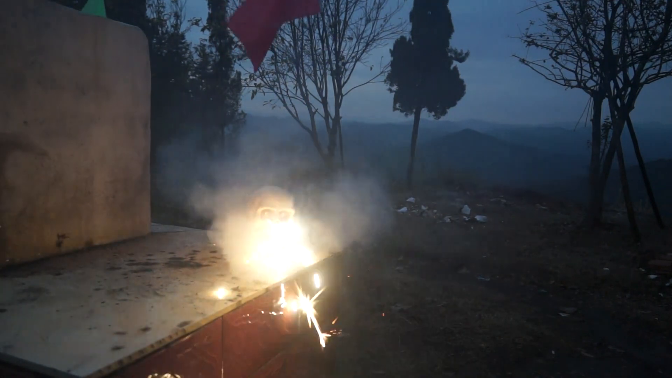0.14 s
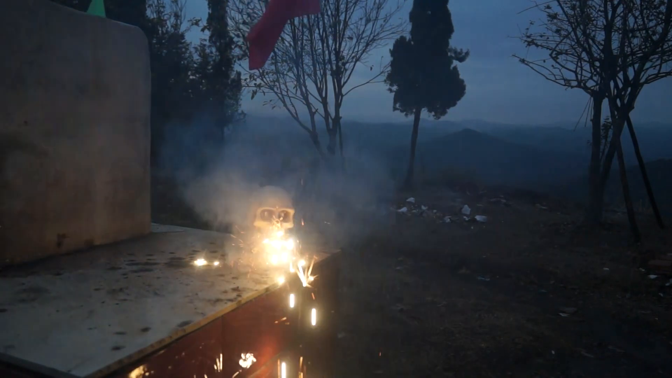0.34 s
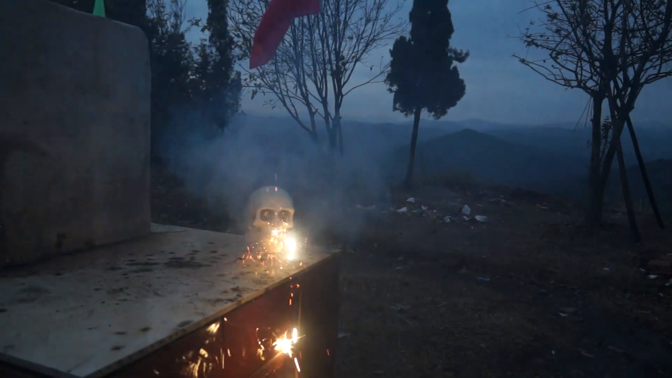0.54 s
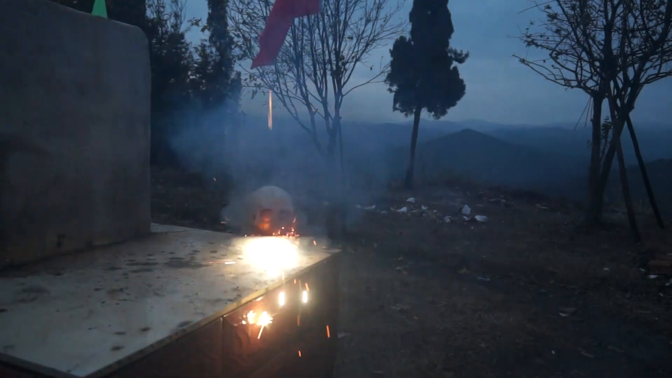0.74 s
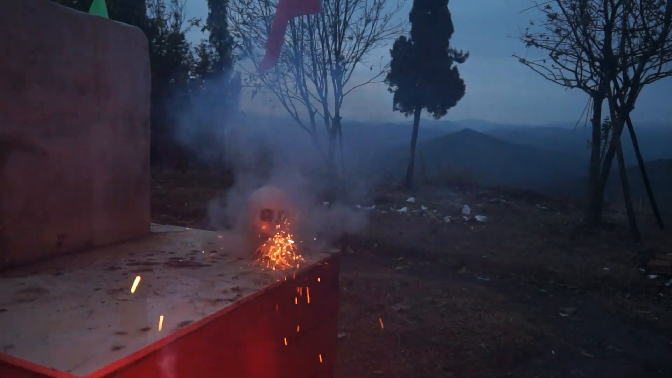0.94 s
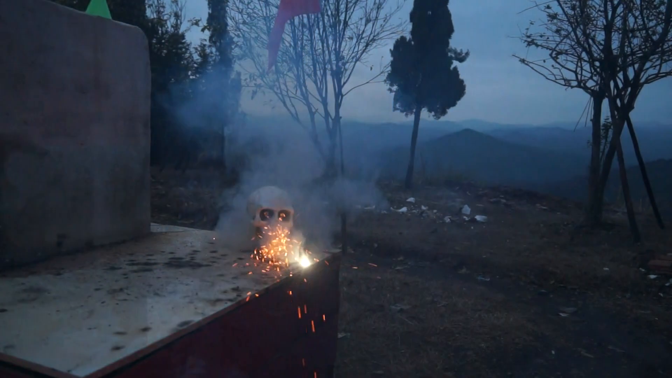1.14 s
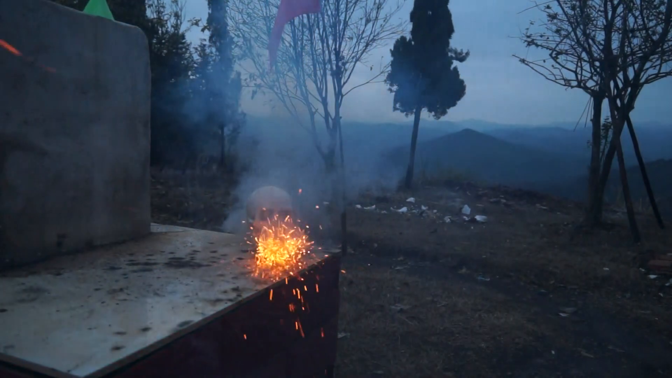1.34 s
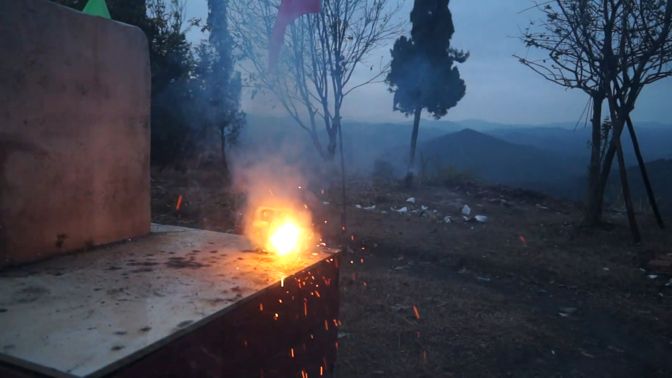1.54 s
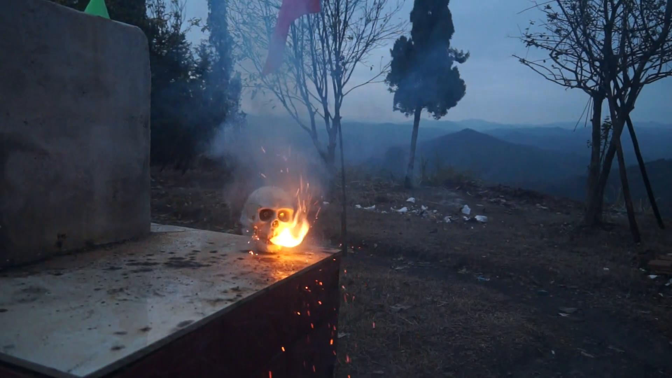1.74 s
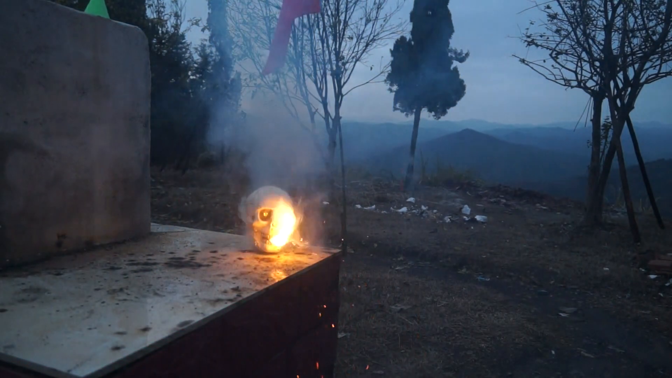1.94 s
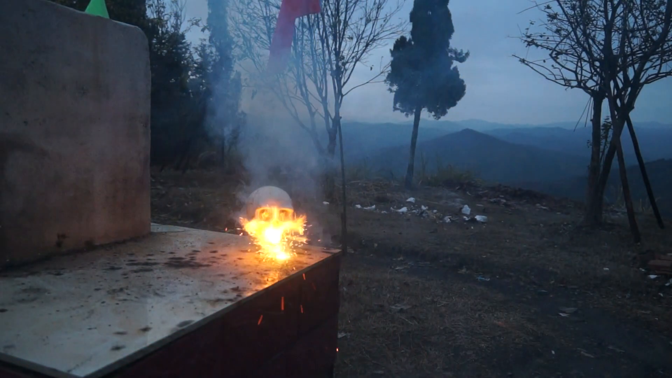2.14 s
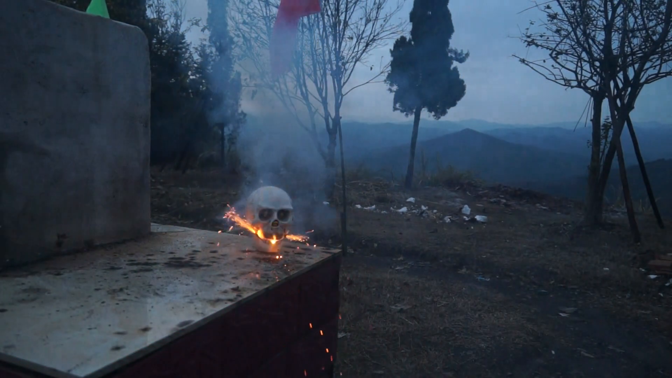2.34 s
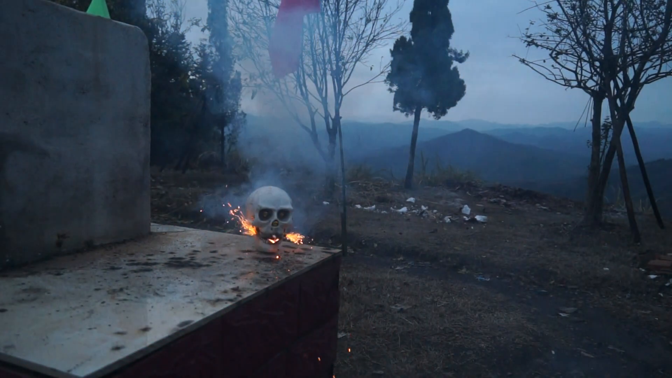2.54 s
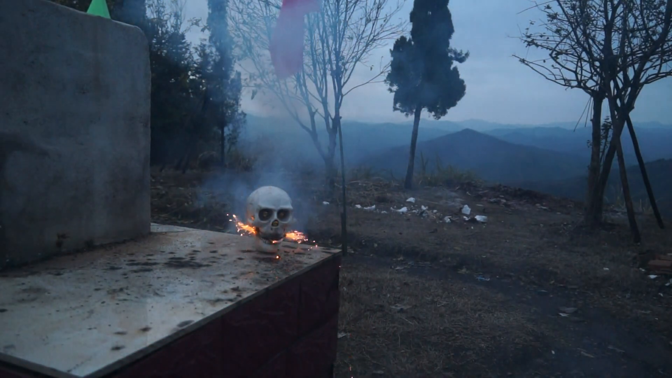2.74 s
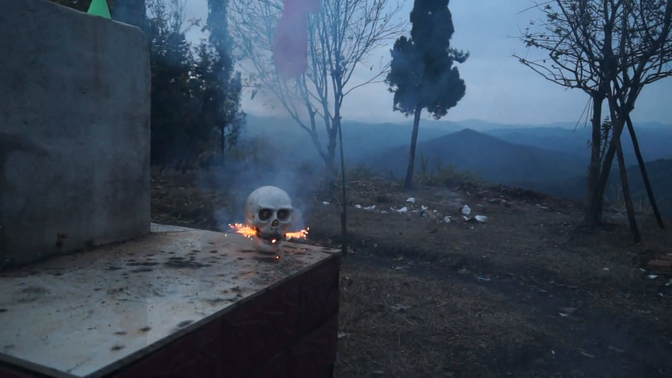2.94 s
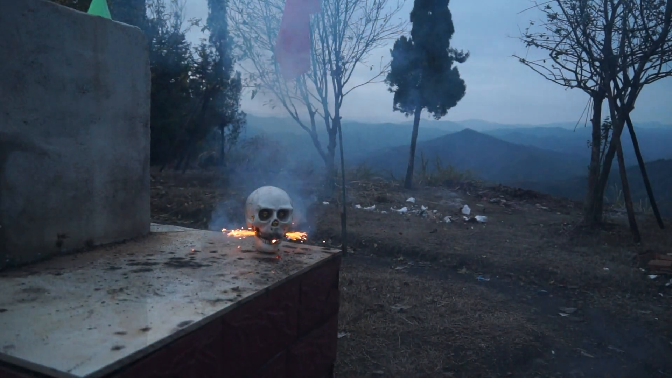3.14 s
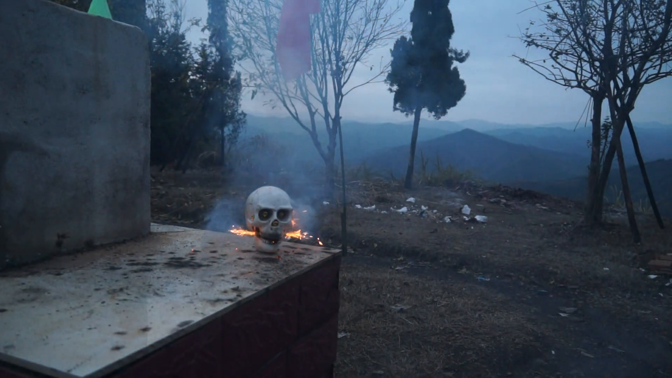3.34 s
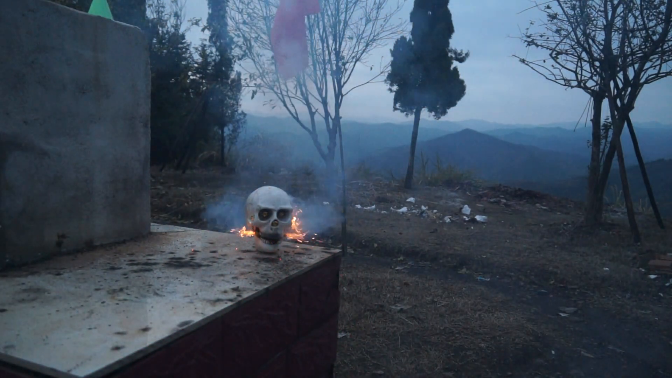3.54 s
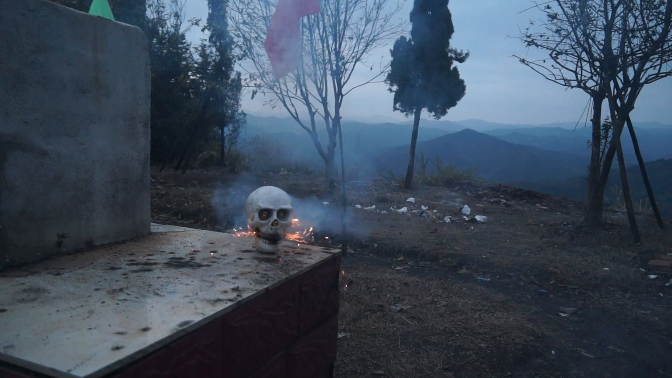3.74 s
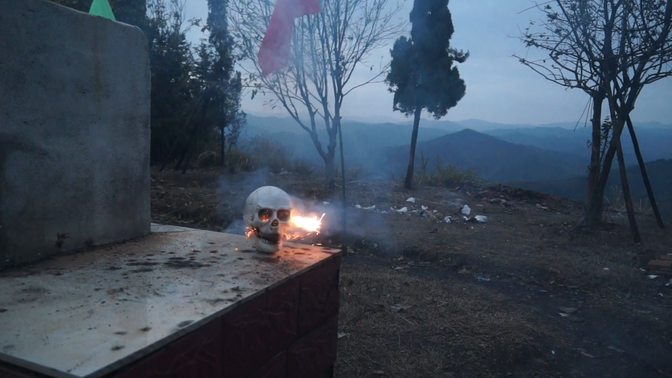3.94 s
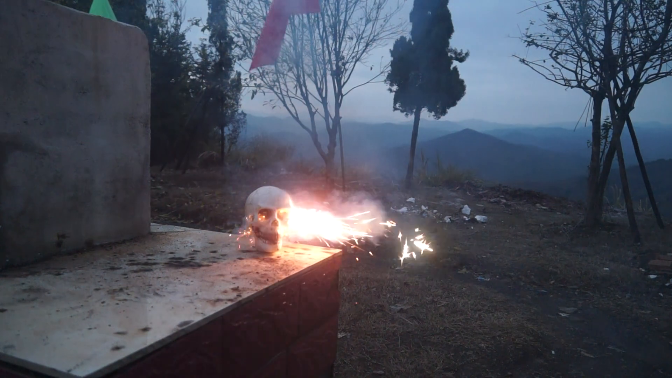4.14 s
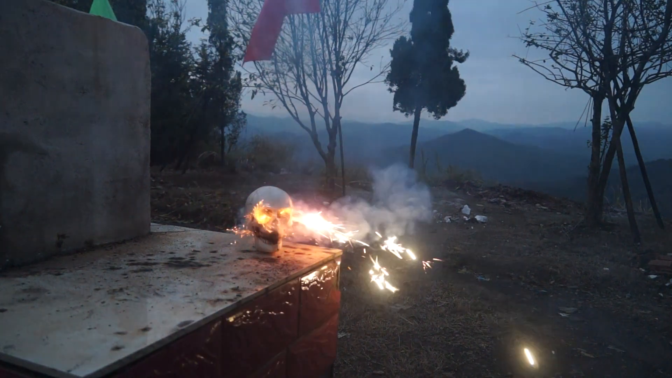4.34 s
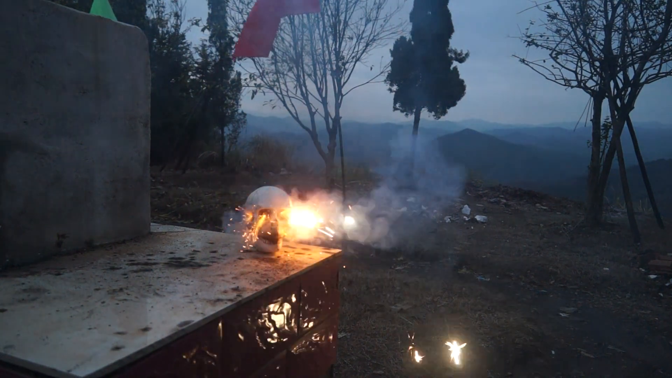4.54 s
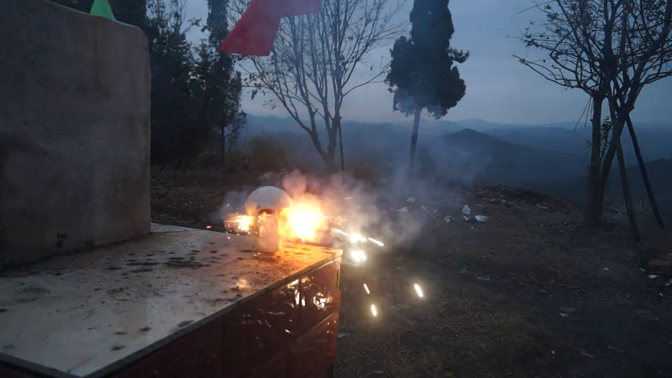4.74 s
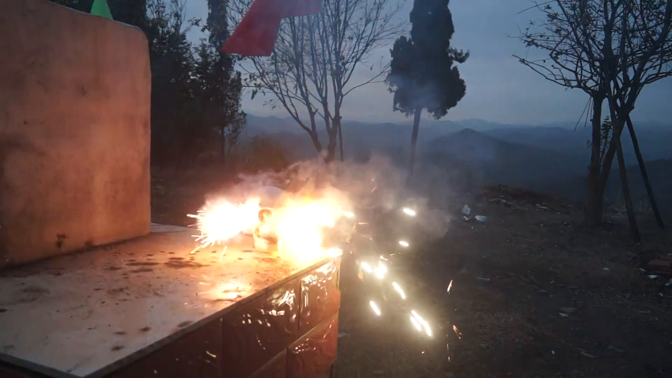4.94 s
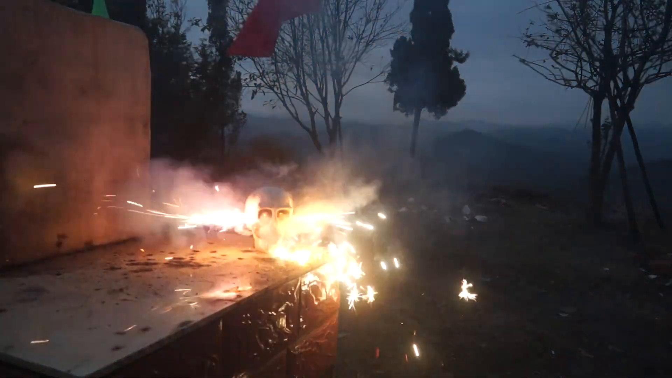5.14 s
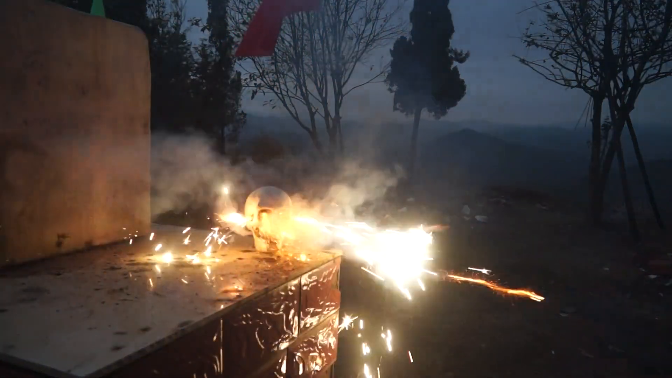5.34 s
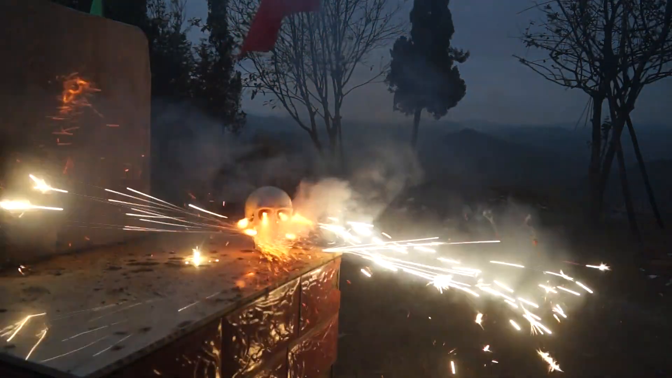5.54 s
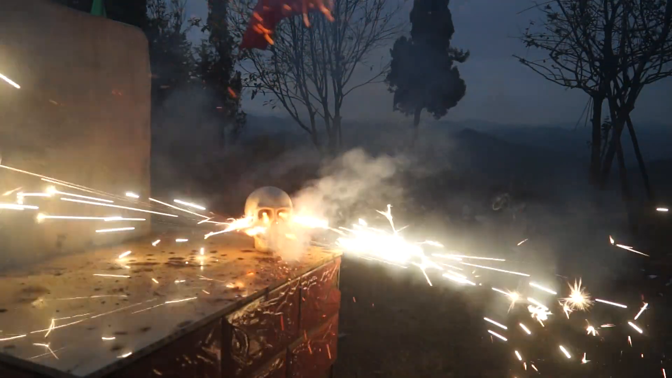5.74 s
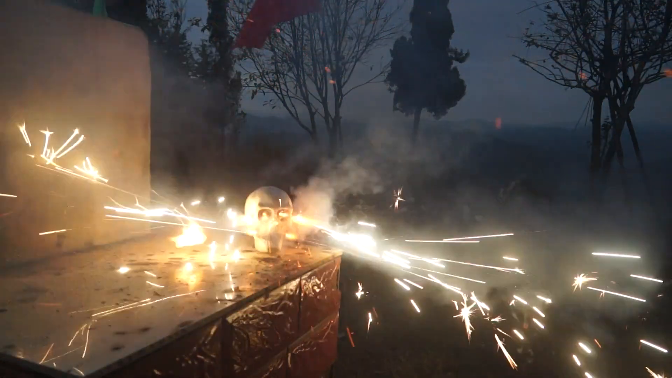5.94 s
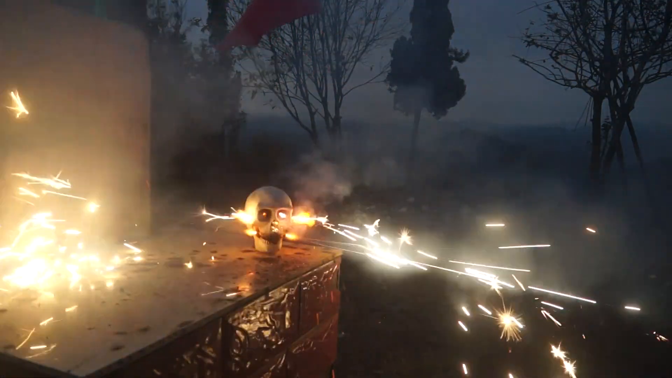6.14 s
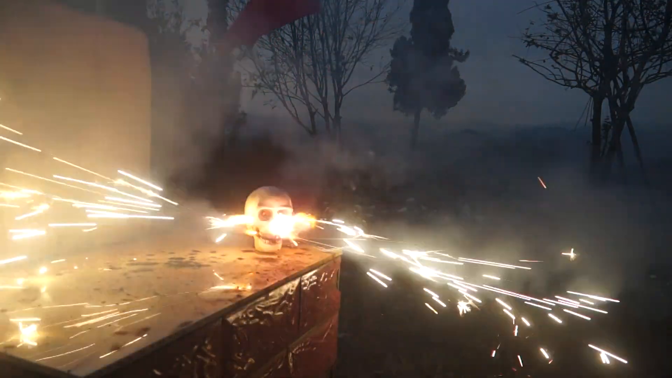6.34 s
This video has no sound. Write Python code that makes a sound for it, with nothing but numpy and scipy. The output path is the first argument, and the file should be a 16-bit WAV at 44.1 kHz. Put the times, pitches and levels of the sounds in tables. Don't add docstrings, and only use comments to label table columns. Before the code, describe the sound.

Outdoors, close to a phone microphone, a small fountain firework fizzes and sputters with crackling sparks, then sharp, distorted cracks that slap off stone. It dies to a faint smoulder, two late pops, then hisses back in swelling flares. Suddenly two piercing whistles light one after the other, loud and harsh, sliding down in pitch over rushing gas until the cut.

```python
import sys
import numpy as np
from scipy import signal
from scipy.fft import rfft, irfft, next_fast_len
from scipy.io import wavfile
from scipy.ndimage import uniform_filter1d, map_coordinates

SR = 44100
rng = np.random.default_rng(int(sys.argv[2]) if len(sys.argv) > 2 else 0)


def master(y):
    cut = np.clip(np.atleast_2d(y).T, -1, 1)
    pcm = np.round(cut * 32767)
    wavfile.write(sys.argv[1], SR, pcm.astype(np.int16))


def volts_from_decibels(level):
    exponent = np.asarray(level, float) / 20
    return 10 ** exponent


N = 286650

SLAB_S = 0.001486
SIDES_S, JETS_S = 2.1, 5.345

# frequency in Hz, density in dB per Hz.
VALLEY_COLOUR = [(20, -14), (60, -3), (200, -4.5), (400, -30)]
# frequency in Hz, density in dB per Hz.
MOUTH_ROAR = [(30, -15), (250, 3.5), (700, 1.5), (1400, -8.5), (2000, -41.5)]
MOUTH_HISS = [(590, -35.5), (1000, -7), (1120, -17), (1350, -6.5), (1730, -9), (2050, -0.5), (2710, -8),
              (2970, -5.5), (4700, -11), (6110, -31.5), (10300, -120)]
# frequency in Hz, density in dB per Hz.
SIDE_ROAR = [(18, -62.5), (30, -36.5), (130, -9), (272, 0.5), (387, -2.5), (492, -12), (588, -3),
             (736, -0.5), (810, -2.5), (892, -3), (1400, -5.5), (1820, -48), (3080, -120)]
SIDE_HISS = [(310, -34.5), (520, -13.5), (643, -4.5), (1130, -9), (1290, -3), (1660, -0.5), (2030, -4),
             (2360, 1.5), (2880, -5.5), (3190, 0), (3530, -5.5), (3800, 0.5), (4250, -3), (4700, -1),
             (6110, -12), (10300, -120)]
# frequency in Hz, density in dB per Hz.
SIZZLE = [(2530, -38.5), (4300, -6.5), (6500, 2), (8200, -3.5), (10700, -22.5), (18000, -120)]
AIR = [(4590, -38.5), (7800, -6.5), (9340, 1), (12300, -3.5), (14100, -7.5), (16000, -21.5)]
# frequency in Hz, correlation (0-1).
FIRE_ALIKE = [(60, 0.75), (130, 0.93), (290, 0.87), (640, 0.96), (1410, 0.98), (3100, 0.84), (6820, 0.97),
              (15000, 0.71)]
JET_ALIKE = [(60, 0.08), (130, 0.17), (290, 0.2), (640, 0.286), (1410, 0.22), (3100, 1), (6820, 1),
             (15000, 0.51)]

# time in seconds, strength in dB, brightness in dB.
MOUTH_FIRE = [
    (0, -37, 2),
    (.3, -31.5, 7.5),
    (.55, -40, 2.5),
    (.6, -49, 3.5),
    (.72, -44, 6),
    (1.45, -60.5, -3),
    (1.65, -54, 4),
    (1.95, -53.5, 4),
    (2.3, -57.5, -4.5),
]
SIDE_FIRE = [
    (2.1, -52.5, -1.5),
    (2.8, -51, 2),
    (3.5, -45.5, -2),
    (3.95, -43.5, 7),
    (4.12, -36.5, 5.5),
    (4.35, -38.5, 1),
    (4.75, -33.5, -2.5),
    (5.18, -31.5, 8.5),
    (5.34, -29, -2),
]
TUBE_JETS = [
    (5.345, -22.5, 3),
    (5.37, -20, 4),
    (5.46, -21.5, 5),
    (5.49, -13, 4.7),
    (5.78, -19, 2),
    (5.86, -16, 6),
    (6, -17, 1),
    (6.25, -15.5, 4),
    (6.5, -15.5, 3),
]
# level in dB at mean strength, growth in dB per dB, share of brightness.
MOUTH_MIX = [
    (-9, 1.48, -1.4),
    (1.9, 0.84, -0.36),
    (-1.5, 0.555, -0.19),
    (-0.7, 0.51, .99),
]
SIDE_MIX = [
    (-13, 1.19, -0.28),
    (0.06, 1.067, -0.093),
    (-1.5, 1.41, 0.44),
    (-0.76, 1.11, .99),
]
JET_MIX = [
    (-3, 2.1, -1.1),
    (0.5, 0.88, -0.028),
    (-2, 1.6, -.3),
    (1.5, 2.5, 0.6),
]
EMBER_MIX = [
    -15.5,
    1,
    0.5,
    -4,
]
PUFF_MIX = [
    -1,
    -3.5,
    -1.5,
    -2,
]

# start in seconds, peak in dB, brightness in dB.
SPARKS = [(0.0633, -13, 11), (0.0744, -19, -1), (0.0818, -18, 0), (0.1001, -17, -1), (0.133, -17, 14),
          (0.17, -15, 12), (0.1975, -19, 12), (0.2092, -17, 15), (0.2242, -16, 9), (0.248, -15, 13),
          (0.2937, -17, 18), (0.3007, -16, 8), (0.3167, -9, -2), (0.3244, -17, 10), (0.3441, -15, 15),
          (0.3576, -18, 8), (0.3798, -14, 10), (0.4128, -12, 16), (0.4182, -14, 13), (0.4221, -1, 0),
          (0.4252, -11, 6), (0.4739, -14, 14), (0.4904, -17, 16), (0.5645, -16, 13), (4.2383, -5, 3),
          (4.303, -6, 5), (4.3768, -20, 16), (4.4598, -19, 16)]
# start in seconds, peak in dB, brightness in dB.
STARS = [(0.4356, -1, -7), (0.531, -5, -4), (0.5679, 1, 4), (0.7062, 1, -7), (0.7193, 2, 3),
         (0.7431, -2, 0), (0.7531, -5, -5), (0.7724, 4, 5), (0.7751, -6, 7), (0.8109, 2, 7), (0.8842, 2, 5),
         (0.8956, 1, 9), (0.9601, -10, -6), (1.0599, 3, 1), (1.1065, 3, 2), (1.1146, 1, 4), (1.1187, -8, 2),
         (1.1204, 1, 0), (1.1379, -11, 2), (1.1787, -15, 6), (1.1924, 2, 4), (1.2068, -16, 2),
         (1.2867, 1, 8), (1.3249, 1, 0), (1.3729, 2, -1), (1.4492, 2, 2), (1.4562, 0, 0), (1.4875, -9, -7),
         (1.9738, 1, -1), (2.0265, 3, 0),
         (0.5754, -20, 8), (0.6266, -22, 13), (1.2916, -27, -2), (1.3309, -23, -4), (1.3809, -19, -9),
             (1.6737, -26, 5), (2.0315, -21, 1), (2.1683, -28, -8), (4.583, -14, -6), (5.1956, -6, 13),
             (5.2983, -12, 3)]
# centre in Hz, width in Hz, level in dB.
DULL_CRACK = [(960, 1100, -4.5), (2080, 690, 2.4), (3820, 2100, -5)]
BRIGHT_CRACK = [(4970, 1820, 10.5), (9610, 3240, 10.5), (12960, 7900, -11)]
# frequency in Hz, 60 dB decay in seconds.
YARD_DECAY = [(200, 0.069), (4000, 0.12), (14000, 0.17)]
# start in seconds, strength in dB, 60 dB decay in seconds.
EMBERS = [
    (.41, -46, 0.13),
    (0.538, -32, 0.1),
    (.68, -44.5, 0.35),
    (0.773, -29, .25),
    (.897, -34, 0.22),
    (1.122, -47.5, .2),
    (1.374, -34.5, 0.14),
    (2.028, -43.5, 0.23),
]
# start in seconds, dip in dB.
SAGS = [(0.5682, -17.5), (0.7034, -19.5), (0.812, -30.5), (0.8847, -16.5), (1.0599, -19.5), (1.1063, -20.5),
        (1.194, -38), (1.2873, -19.5), (1.324, -29), (1.4484, -40.5), (1.9745, -21), (2.0275, -21),
        (4.238, -32), (4.305, -20.5), (5.353, -7)]
# start in seconds, left size, right size, first swing in milliseconds.
THUMPS = [(0.7718, -1.04, -0.1, 1.26), (.7721, -0.46, -2.5, 0.86), (0.8949, 0.57, -0.14, 1.7),
          (1.3726, -0.65, -0.24, 2.17), (1.3733, 0.41, 0.58, 1.94), (2.0262, 0.28, 0.14, 1.43),
          (2.0268, -0.5, 0.64, 1.25), (0.8117, -0.057, 0.36, 1.23), (0.8115, -0.13, -0.27, 1.8),
          (1.1147, 0.24, -0.13, 0.81), (1.12, .1, 0.16, 1), (1.325, -0.005, 0.26, 1.7),
          (1.1924, 0.16, -0.12, 2.5)]
# middle in seconds, strength in dB, half length in seconds.
PUFFS = [
    (4.085, -41.5, 0.12),
    (4.818, -32, 0.08),
    (5.049, -25, 0.14),
]

# time in seconds, pitch in Hz, tone in dB, unevenness in dB.
FIRST_WHISTLE = [
    (5.343, 2885, -8, -4.5),
    (5.385, 2857, -7, -8.5),
    (5.475, 2842, -7.5, -9.5),
    (5.57, 2715, -14, -9.5),
    (5.8, 2590, -20, -7),
    (5.9, 2526, -14, -13),
    (6.11, 2447, -15.5, -19),
    (6.22, 2392, -11, -21),
    (6.5, 2343, -15, -19),
]
SECOND_WHISTLE = [
    (5.474, 3086, -7.5, -15),
    (5.575, 3008, -15, -3.5),
    (5.625, 2899, -34, 14),
    (5.69, 2856, -13, -0.5),
    (5.77, 2728, -6, -8.5),
    (5.81, 2761, -7, -4),
    (5.9, 2668, -7.5, -11),
    (6.2, 2508, -13.5, -2),
    (6.5, 2426, -11.5, -1.5),
]
# multiple of half the pitch, level in dB. They follow the tone, the weak stroke, the shrill level.
TONE_PARTIALS = [(4, -18), (6, -21), (8, -21), (10, -27)]
WEAK_STROKE_PARTIALS = [(1, -11), (3, 0), (5, -7)]
SHRILL_PARTIALS = [(7, 2.5), (9, -12.5), (11, -20.5)]


def unit(x):
    return x / np.sqrt(np.mean(x ** 2) + 1e-20)


def along(points, hz):
    f, v = np.transpose(points)
    return np.interp(np.log(hz + 1), np.log(f + 1), v)


def curves(rows, t):
    s, *cols = np.transpose(rows)
    return [np.interp(t, s, c) for c in cols]


def wobble(rate, size):
    knots = rng.standard_normal(int(size * rate / SR) + 4)
    return map_coordinates(knots, [np.arange(size) * rate / SR], order=2)


def filtered(x, response):
    m = next_fast_len(x.shape[-1] + SR // 2)
    return irfft(rfft(x, m) * response(np.fft.rfftfreq(m, 1 / SR)), m)[..., :x.shape[-1]]


def modes(table):
    def response(f):
        return sum((-1) ** k * volts_from_decibels(db) * 1j * f * width / (centre * centre - f * f + 1j * f * width)
                   for k, (centre, width, db) in enumerate(table))
    return response


def placed(source, start_s, end_s):
    at = np.arange(round(start_s * SR), min(round(end_s * SR), N))
    return np.pad(np.atleast_2d(source(at / SR)), ((0, 0), (at[0], N - at[-1] - 1)))


def rush(spectrum, alike, grain_db, slab, size):
    pair = rng.standard_normal((2, size))
    pair = pair * volts_from_decibels(grain_db * wobble(900, size) + 1.1 * wobble(40, size))

    def mid_side(hz):
        turn = np.arccos(np.clip(along(alike, hz), -1, 1)) / 2
        comb = 1 + slab * np.exp(-2j * np.pi * hz * SLAB_S)
        return volts_from_decibels(along(spectrum, hz)) * comb * np.array([np.cos(turn), np.sin(turn)])

    mid, side = filtered(pair, mid_side)
    return unit(np.array([mid + side, mid - side]))


def flame(t, rows, mix, roar, hiss, alike, grain_db, slab, flares=0, flare_db=(0, 0, 0, 0)):
    strength_db, bright_db = curves(rows, t)
    pivot_db = strength_db.mean()
    gas = 0
    for (db, grows, share), extra_db, colour in zip(mix, flare_db, (roar, hiss, SIZZLE, AIR)):
        steady = volts_from_decibels(pivot_db + db + grows * (strength_db - pivot_db) + share * bright_db)
        level = np.hypot(steady, volts_from_decibels(extra_db) * flares)
        gas = gas + level * rush(colour, alike, grain_db, slab, len(t))
    return gas


def valley_rumble():
    return volts_from_decibels(-72.5) * rush(VALLEY_COLOUR, FIRE_ALIKE, grain_db=1.5, slab=0, size=N)


def mouth_fire(t):
    return flame(t, MOUTH_FIRE, MOUTH_MIX, MOUTH_ROAR, MOUTH_HISS, FIRE_ALIKE, grain_db=2.5, slab=0.11,
                 flares=embers(t), flare_db=EMBER_MIX)


def star_cracks():
    dull, bright, t = np.zeros((2, N)), np.zeros((2, N)), np.arange(200) / SR
    bursts = [(*row, -11) for row in SPARKS]
    bursts += [(*row, -6) for row in STARS]
    chance = rng.standard_normal((len(bursts), 3, len(t)))
    ragged = chance[:, :1] + .22 * chance[:, 1:]
    debris = ragged * (.6 * volts_from_decibels(-60 * t / .0013) + volts_from_decibels(-27 - 60 * t / .008))
    debris[:, :, 0] = -1.36
    lags = np.round(SLAB_S * SR + 2 * chance[:, 0, 0]).astype(int)
    for (s, db, bright_db, echo_db), direct, lag in zip(bursts, debris, lags):
        soft = volts_from_decibels(echo_db + 3.0) * uniform_filter1d(direct * np.exp(-t / .0006), size=3)
        shock = np.pad(direct, ((0, 0), (0, 2 * lag)))
        shock += np.pad(soft, ((0, 0), (lag, lag)))
        shock += 0.083 * np.pad(soft, ((0, 0), (2 * lag, 0)))
        start = round(s * SR) - 2
        at = slice(start, start + shock.shape[1])
        db += 1.1 * max(db, 0)
        dull[:, at] += shock * volts_from_decibels(db + 0.6 * min(-bright_db, 0) + 9)
        bright[:, at] += shock * volts_from_decibels(db + 1.1 * min(bright_db, 0) - 0.5)
    return filtered(dull, modes(DULL_CRACK)) + filtered(bright, modes(BRIGHT_CRACK))


def yard(x):
    hz, t, z = signal.stft(rng.standard_normal((2, SR // 4)), SR, nperseg=128)
    tail = signal.istft(z * volts_from_decibels(-60 * t / along(YARD_DECAY, hz)[:, None]), SR, nperseg=128)[1]
    late = np.pad(x, (120, 0))
    return signal.fftconvolve(late[None], tail / np.linalg.norm(tail[0]), axes=1)[:, :N]


def embers(t):
    return sum(volts_from_decibels(db - 60 * np.maximum(t - s, 0) / t60) * np.clip((t - s) / 0.0055, 0, 1)
               for s, db, t60 in EMBERS)


def capsule_sags():
    out, ms = np.zeros((2, N)), np.arange(SR // 20) / SR * 1000
    for s, db in SAGS:
        out[:, round(s * SR):][:, :len(ms)] -= volts_from_decibels(db) * np.e * ms / 5.2 * np.exp(-ms / 2.8)
    return out


def diaphragm_thumps():
    out, ms = np.zeros((2, N)), np.arange(SR // 20) / SR * 1000
    for s, left, right, swing_ms in THUMPS:
        swing = np.sin(np.pi * np.log(1 + 1.15 * ms / swing_ms) / np.log(2.15))
        swing *= np.exp(-ms / (3.5 * swing_ms))
        out[:, round(s * SR):][:, :len(ms)] += np.outer([left, right], swing)
    return out


def side_fire(t):
    return flame(t, SIDE_FIRE, SIDE_MIX, SIDE_ROAR, SIDE_HISS, FIRE_ALIKE, grain_db=0.5, slab=0,
                 flares=puffs(t), flare_db=PUFF_MIX)


def puffs(t):
    return sum(volts_from_decibels(db - 22.5 * ((t - s) / half_s) ** 2) for s, db, half_s in PUFFS)


def whistle(t, rows, drift, flutter_db, weak_db):
    pitch_hz, tone_db, odd_db = curves(rows, t)
    lit_s, size = t - t[0], len(t)
    catch_s = .0055
    pitch_hz = pitch_hz * (1 + .1 * lit_s / catch_s * np.exp(1 - lit_s / catch_s))
    odd_db = odd_db - 25 * np.clip((.03 - lit_s) / .01, 0, 1)
    uneven_db, shrill_db = tone_db + .9 * odd_db + weak_db, tone_db + odd_db
    ragged = (0.00302 + 0.0805 * np.exp(-lit_s / 0.0186)) * wobble(500, size)
    wander = drift * (wobble(80, size) + wobble(45, size))
    phase = np.pi * np.cumsum(pitch_hz * (1 + wander + ragged)) / SR

    def stack(table):
        return sum(volts_from_decibels(db + flutter_db * wobble(70.14, size)) * np.sin(k * phase + rng.uniform(0, 2 * np.pi))
                   for k, db in table)

    tone = volts_from_decibels(tone_db) * stack([(2, 0.012)] + TONE_PARTIALS)
    uneven = volts_from_decibels(uneven_db) * stack(WEAK_STROKE_PARTIALS)
    shrill = volts_from_decibels(shrill_db) * stack(SHRILL_PARTIALS)
    overload = volts_from_decibels(10.5) * np.minimum(lit_s / .007, 1)
    return overload * (tone + uneven + shrill)


def whistle_tubes():
    first = placed(lambda t: whistle(t, FIRST_WHISTLE, drift=.0038, flutter_db=1.5, weak_db=-6), 5.344, 7)
    second = placed(lambda t: whistle(t, SECOND_WHISTLE, drift=.0048, flutter_db=2, weak_db=-11), 5.474, 7)
    return first * volts_from_decibels([[1.2], [-1.2]]) + second * volts_from_decibels([[-.8], [.8]])


def tube_jets(t):
    return flame(t, TUBE_JETS, JET_MIX, SIDE_ROAR, SIDE_HISS, JET_ALIKE, grain_db=4.0, slab=0)


def scene():
    handover = np.clip((np.arange(N) / SR - SIDES_S) / .2, 0, 1)
    gas = np.sqrt(1 - handover) * placed(mouth_fire, 0, JETS_S / 2)
    gas += np.sqrt(handover) * placed(side_fire, SIDES_S, JETS_S)
    gas += placed(tube_jets, JETS_S, 2 * JETS_S)
    valley = valley_rumble()
    cracks = star_cracks()
    tubes = whistle_tubes()
    echoes = yard(volts_from_decibels(-24) * cracks.mean(0) + volts_from_decibels(-13.0) * tubes.mean(0))
    return valley + gas + cracks + tubes + echoes + diaphragm_thumps() + capsule_sags()


def roll_off(x):
    return signal.sosfilt(signal.butter(12, 16420, fs=SR, output="sos"), x)


def record(dry):
    capsule = dry / (1 + np.abs(dry / .67) ** 8) ** (1 / 8)
    port = modes([(10300, 5900, -18.5)])

    def response(hz):
        low_cut = (1j * hz) ** 2 / (5.5 ** 2 - hz ** 2 + 1j * hz * 5)
        return low_cut * (1 + port(hz)) * (hz < 16000)

    mix = np.clip(filtered(capsule, response), -1, 1)
    return roll_off(mix)


dry = scene()
out = record(dry)
master(out)
```